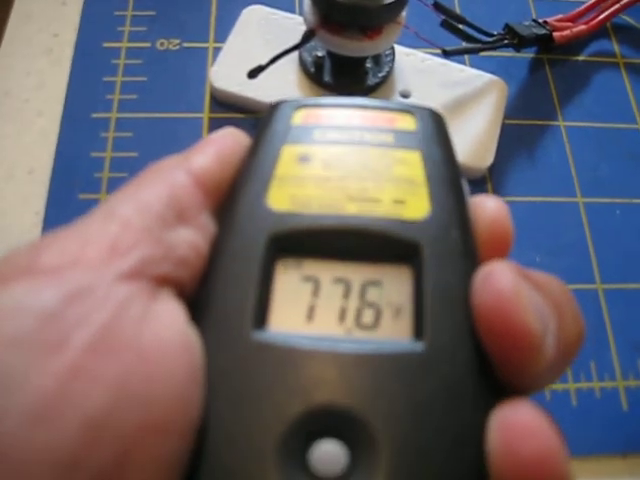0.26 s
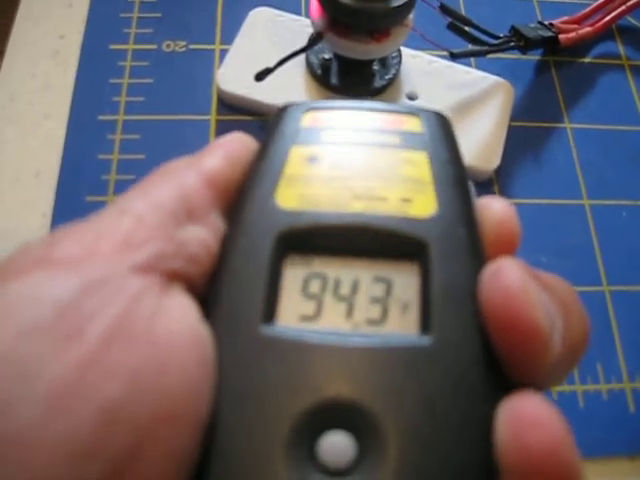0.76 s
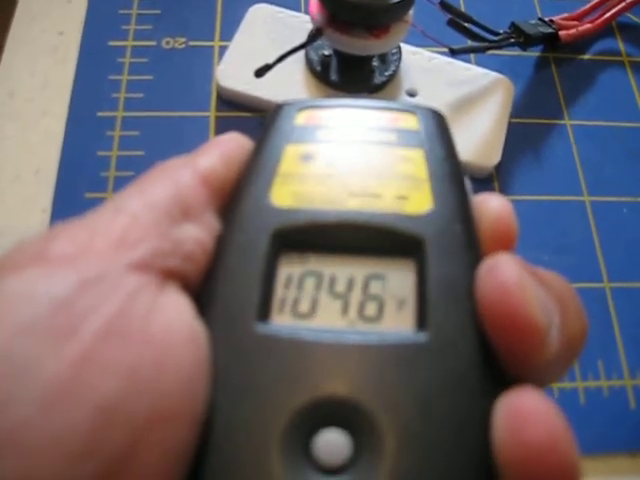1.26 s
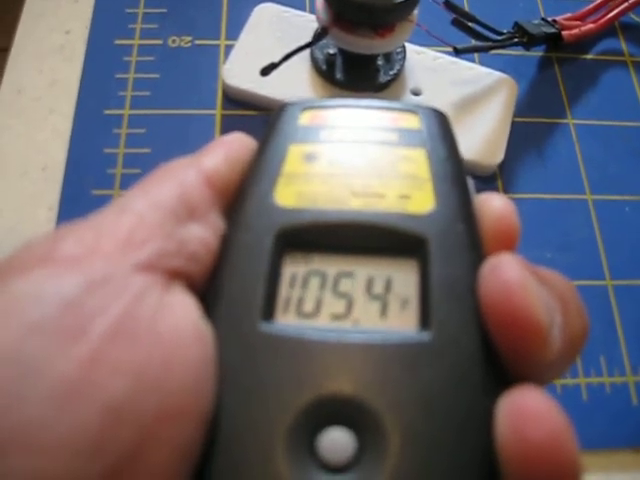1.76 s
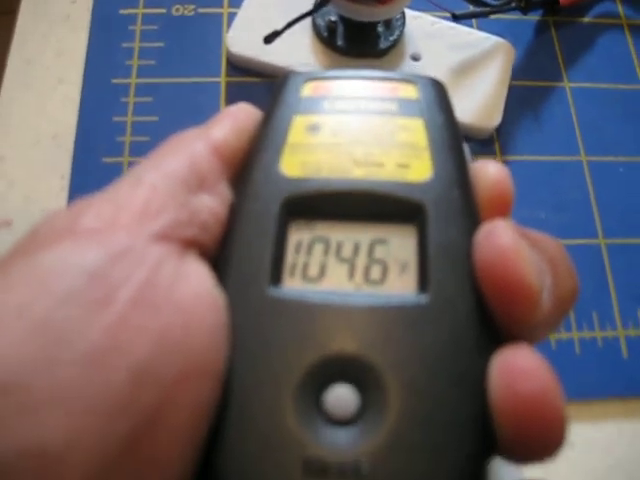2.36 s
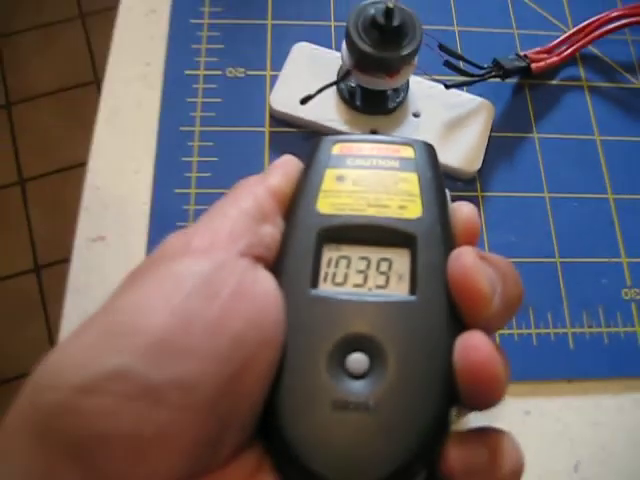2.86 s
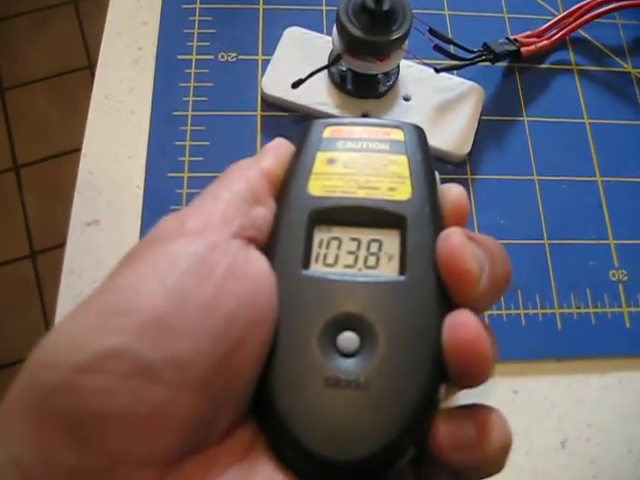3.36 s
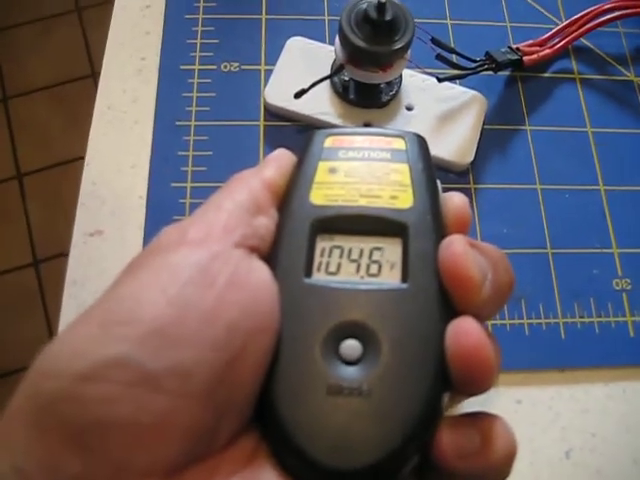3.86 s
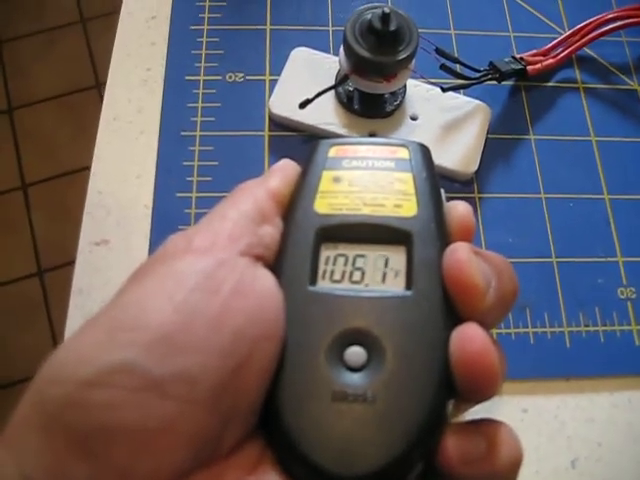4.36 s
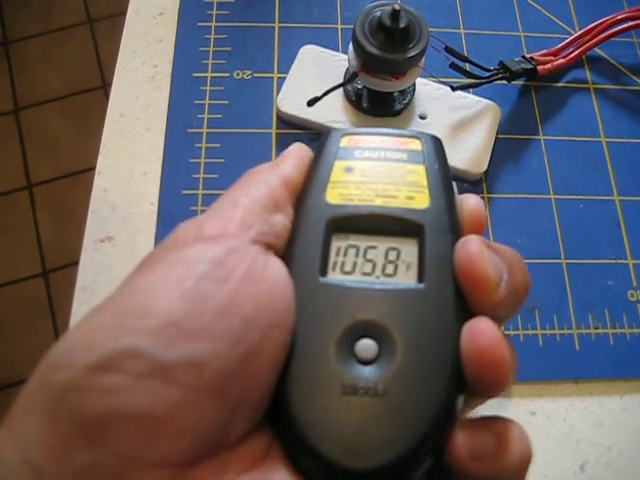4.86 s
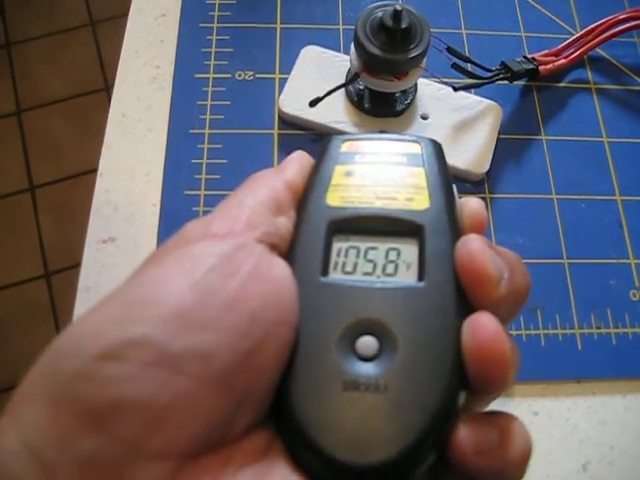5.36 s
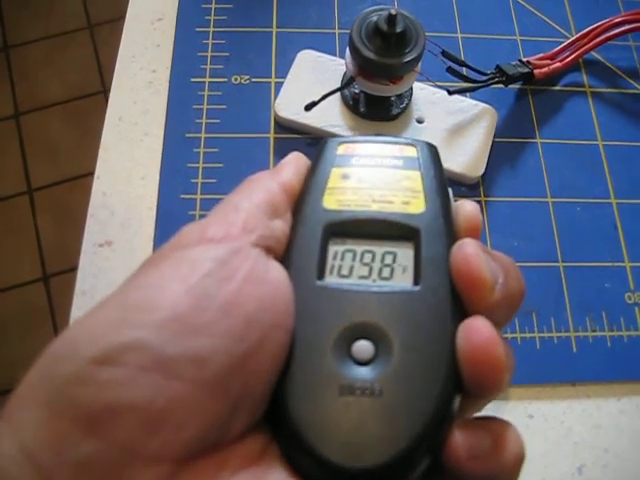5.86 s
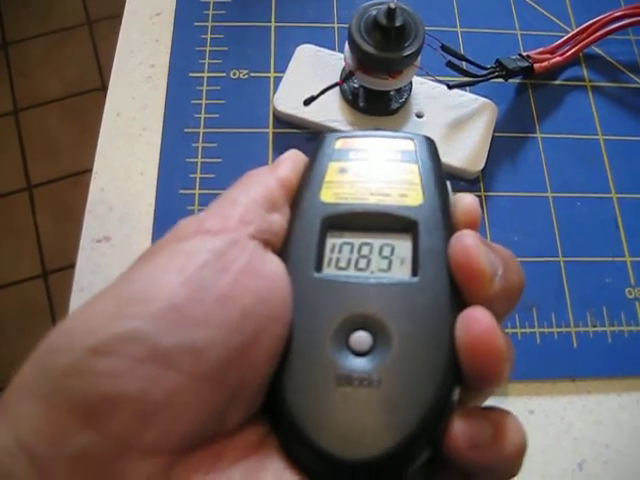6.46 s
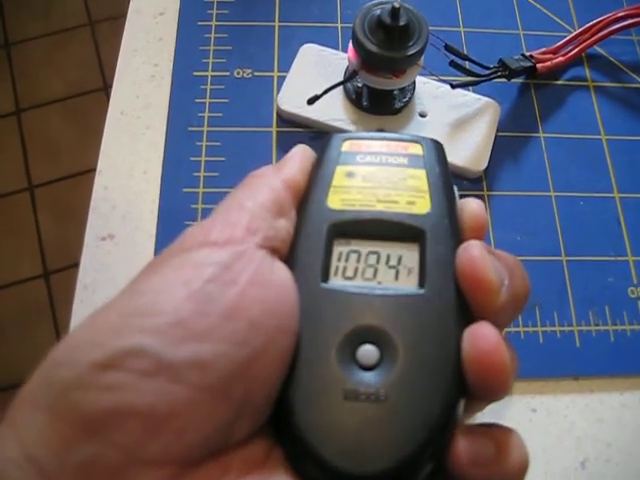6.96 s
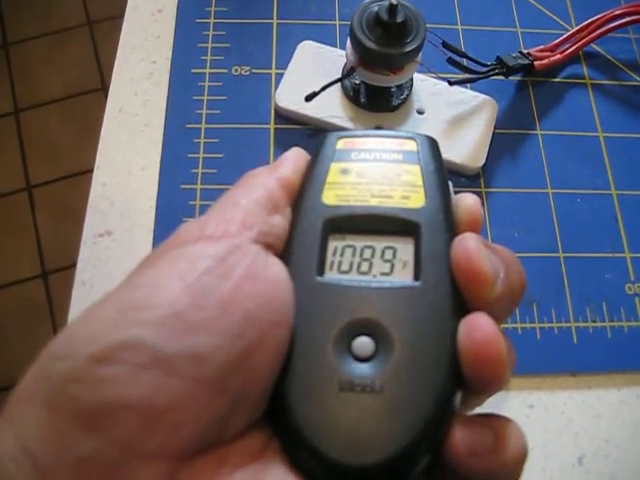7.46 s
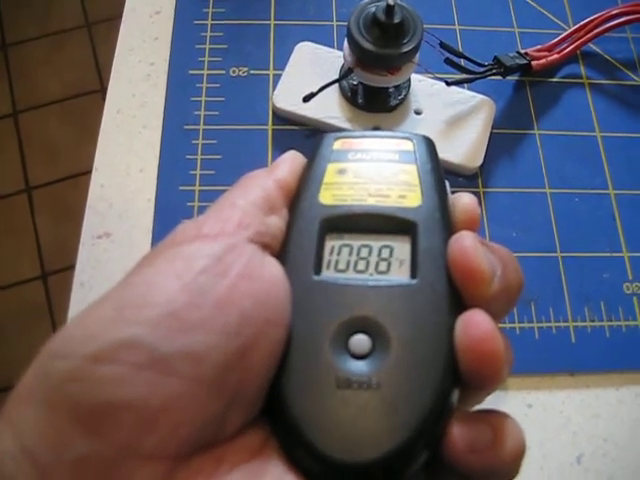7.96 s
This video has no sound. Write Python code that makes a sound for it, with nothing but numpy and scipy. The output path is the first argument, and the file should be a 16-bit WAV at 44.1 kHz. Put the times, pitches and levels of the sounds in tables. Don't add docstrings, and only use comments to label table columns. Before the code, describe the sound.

Continuous raspy whir of a tiny brushless motor on a workbench, with a shrill steady whistle and small brief surges in pitch.

```python
import sys
import numpy as np
from scipy import signal
from scipy.fft import rfft, irfft, next_fast_len
from scipy.io import wavfile
from scipy.ndimage import uniform_filter1d

SR = 44100
rng = np.random.default_rng(int(sys.argv[2]) if len(sys.argv) > 2 else 0)


def pcm_store(signal):
    levels = np.round(np.clip(np.atleast_2d(signal), -1, 1) * 32767)
    wavfile.write(sys.argv[1], SR, levels.astype(np.int16).T)


def ratio(d):
    e = np.asarray(d, float) / 20
    return 10 ** e


N = 361619
T = np.arange(N) / SR

STANCE = [
    (2.5, 0),
    (2.85, 1),
    (4.5, 1),
    (4.58, 2),
    (6.4, 2),
    (6.55, 3),
]
# (time [s], speed [m/s], half length [s])
CAMERA_PULLS = [
    (2.69, .19, .12),
    (3.3, .28, .075),
    (3.64, .13, .06),
]
# (time [s], level [dB], half length [s])
HAND_SHADOWS = [
    (2.33, 2, 0.046),
    (2.55, -3, .06),
    (2.7, -4, .03),
    (2.82, -1, .04),
    (3.7, -1.5, 0.24),
]
# (time [s], speed [turns/s])
SETTLED_SPEED = [
    (0, 94.9),
    (1.5, 95.03),
    (2.8, 95.3),
    (4.2, 95.45),
    (5.2, 95.56),
    (6.2, 95.7),
    (8.2, 95.82),
]
# (time [s], speed gained [turns/s])
SLIPS = [
    (0, 1.3),
    (.76, .8),
    (4.51, .75),
    (5.19, .75),
    (6.42, .75),
    (7.43, .75),
]

# (frequency [Hz], level [dB per Hz])
ROOM_SPECTRUM = [(30, -89), (60, -89), (150, -88.5), (300, -89), (600, -90), (1200, -89)]
# (frequency [Hz], level [dB per Hz])
AIR_SPECTRUM = [(9200, 4), (10000, 2), (12500, -4), (14000, 2), (17000, 2)]
# (frequency [Hz], level [dB per Hz])
RASP_SPECTRUM = [(4650, 7), (5000, -2.5), (5700, 2.5)]

# (ball passes, shaft turns added, level close [dB], level moved back [dB])
BALL_TONES = [(1, 3, -76, -78), (-1, 10, -73, -75), (1, 4, -73, -75), (1, 6, -74, -70), (1, 7, -70, -72),
              (2, 4, -72, -67), (-1, 15, -71, -69), (1, 9, -73, -74), (-1, 17, -71, -70),
              (-1, 20, -72, -67), (1, 15, -69, -70), (1, 17, -64, -66), (-1, 24, -54, -58),
              (-1, 25, -55, -59), (-1, 26, -66, -69)]
BALL_PASS = 3.228

# (angle [turns], level [dB])
TICK_SPOTS = [(.04, 4), (0.165, 8), (.29, 3.5), (.42, 6), (.55, 8.5), (.605, -20), (0.693, 0), (.81, -17),
              (.87, -9), (.95, -10)]
# (angle [turns], level [dB])
KNOCK_SPOTS = [(.08, 4), (.16, -4), (.22, -11), (.34, 3.5), (.44, 3), (.52, 2), (0.6, 5), (.73, -17),
               (.85, 5.5)]
# (frequency [Hz], level [dB per Hz])
BELL_RING = [(7100, -82), (7400, -73), (7600, -87), (8150, -76), (8400, -76), (8550, -74), (8900, -74),
             (9200, -67), (10000, -63), (11000, -63.5), (12000, -69), (13100, -74), (14000, -72.5),
             (17000, -75.5)]
# (frequency [Hz], level [dB per Hz])
BLOCK_RING = [(900, -86), (1500, -83), (1800, -79), (2050, -73.5), (2250, -77), (2700, -70), (3200, -69),
              (4200, -72.5), (4900, -63), (5700, -66), (5800, -76), (6250, -80.5), (6800, -68),
              (7080, -81.5)]

# (multiple of chopping rate, shaft turns added, close [dB], moved back [dB], crept [dB])
WHISTLE_TONES = [(1, -32, -47, -48, -48), (1, -24, -71, -53, -53), (1, -16, -52, -54, -51),
                 (1, -13, -58, -53, -56), (1, -8, -51, -49, -47), (1, -7, -54, -51, -50),
                 (1, -6, -47, -51, -51), (1, -5, -53, -54, -57), (1, -4, -63, -65, -67),
                 (1, 0, -45, -44, -44), (1, 4, -63, -55, -59), (1, 5, -56, -55, -53), (1, 6, -40, -43, -43),
                 (1, 7, -55, -57, -61), (1, 8, -37, -36, -38), (1, 9, -63, -59, -58),
                 (1, 16, -46, -45, -45), (1, 24, -47, -49, -47), (2, -32, -58, -52, -55),
                 (2, -16, -54, -54, -54), (2, -8, -43, -44, -44), (2, -6, -49, -50, -49)]

# (close [dB], moved back [dB], crept [dB], crept again [dB])
HUM_LEVELS = [(-59, -60, -61, -62), (-68, -66, -64, -65), (-59, -58, -56, -54.5), (-68, -67, -69, -69.5),
              (-71, -74, -79, -80), (-53, -55, -54, -56), (-59, -61, -63, -68), (-58, -57, -60, -60),
              (-69, -65, -73, -70), (-63, -58, -59, -60.5), (-61, -64, -60, -58.5), (-57, -58, -61, -61.5),
              (-57, -60, -60, -62), (-56, -55, -54, -54), (-62, -70, -62, -61.5), (-65, -63, -62, -59),
              (-71, -72, -70, -71), (-61, -65, -61, -59), (-57, -70, -65, -63), (-62, -58, -57.5, -56),
              (-56.5, -59, -50, -50.5), (-66, -64, -63, -66), (-46.5, -43, -49, -50), (-65, -61, -55, -53)]
# (multiple, level [dB])
HIGH_HUM = [(26, -57), (28, -46), (30, -46.5), (32, -50), (36, -50.5), (38, -51), (44, -56), (45, -58),
            (48, -59)]
SURGE_GAIN = {2: -8, 3: 3, 5: -18, 8: -13, 10: -4, 11: -3, 12: 3, 15: 3, 16: 7, 20: 6, 22: -3, 23: 10, 24:
              2}
THUMP_LAG = [(3, -.05), (4, -.33), (8, -.3), (11, .45), (22, .43), (24, .38), (48, .38)]


def curve(table):
    times, values = np.transpose(table)
    return np.interp(T, times, values)


def bumps(rows):
    return sum(height * np.exp(-((T - s) / half) ** 2) for s, height, half in rows)


def walk(rate):
    hold = int(SR / rate)
    steps = np.repeat(rng.standard_normal(N // hold + 1), hold)
    return 1.129 * uniform_filter1d(uniform_filter1d(steps, hold), hold)[:N]


def colour(x, spectrum):
    hz, db = np.transpose(spectrum)
    log_hz = np.log(hz)
    size = next_fast_len(N)
    f = np.log(np.arange(size // 2 + 1) * SR / size + 1)
    beyond = np.maximum(log_hz[0] - f, 0) + np.maximum(f - log_hz[-1], 0)
    gain = ratio(np.interp(f, log_hz, db) - 49 * beyond)
    y = irfft(rfft(x, size) * gain, size)[:N]
    return y / np.std(y)


def tones(rows, surge, waver_db, waver_rad):
    step = 64
    stance = curve(STANCE)[::step]
    wander = np.array([walk(9) for _ in range(7)])
    out = np.zeros(N)
    for k, (phase, stance_db, surge_db) in enumerate(rows):
        db = np.interp(stance, np.arange(len(stance_db)), stance_db)
        db = db + surge_db * surge[::step] + waver_db * wander[k % 7, ::step]
        level = np.repeat(ratio(db), step)[:N]
        out += np.sqrt(2) * level * np.sin(phase + waver_rad * wander[(k + 3) % 7])
    return out


def rattle(turns, spots, scatter_db, jitter, burst_ms, steady_db, grit_db):
    angle, db = np.transpose(spots)
    chance = rng.standard_normal((int(turns[-1]), len(spots), 2))
    when = np.arange(len(chance))[:, None] + angle + jitter * chance[..., 0]
    place = np.interp(when, turns, np.arange(N)).astype(int)
    strength = ratio(db + scatter_db * np.clip(chance[..., 1], -3, 1.3))
    strikes = np.zeros(N)
    np.add.at(strikes, place, strength)
    age = np.arange(200) / SR / (burst_ms / 1000)
    bursts = signal.fftconvolve(strikes, age * np.exp(1 - age))[:N]
    rubbing = ratio(steady_db + grit_db * walk(900))
    return (bursts + rubbing) * rng.standard_normal(N)


def slip_surges():
    rise_s, decay_s = .07, .19
    gained = np.zeros(N)
    for s, hz in SLIPS:
        age = T - s
        gained += hz * np.clip(age / rise_s, 0, 1) * np.exp(-np.maximum(age - rise_s, 0) / decay_s)
    return gained


def shaft_turns(surge):
    hunt_hz = .05
    return np.cumsum(curve(SETTLED_SPEED) + surge + hunt_hz * walk(14)) / SR


def room():
    return ratio(-60) * colour(rng.standard_normal(N), ROOM_SPECTRUM)


def dragged_air():
    return ratio(-37) * colour(rng.standard_normal(N), AIR_SPECTRUM)


def rasp(turns):
    tracks = rng.standard_normal((3, 256))
    place = (turns + .0015 * walk(30)) % 1 * 256
    share = np.array([walk(3.5) for _ in tracks])
    share = share / np.sqrt(np.sum(share ** 2, axis=0))
    scratch = np.zeros(N)
    for s, track in zip(share, tracks):
        scratch += s * np.interp(place, np.arange(256), track, period=256)
    return ratio(-41.5) * colour(scratch, RASP_SPECTRUM)


def bearing(turns):
    ticks = rattle(turns, TICK_SPOTS, scatter_db=3.6, jitter=.007, burst_ms=.17, steady_db=-7.5, grit_db=2.6)
    knocks = rattle(turns, KNOCK_SPOTS, scatter_db=2.0, jitter=.0081, burst_ms=.38, steady_db=-.5, grit_db=4.0)
    flutter = .41 * walk(16) + 1.73 * walk(150)
    bell = colour(ticks, BELL_RING) * ratio(-28.48 + .3 * flutter)
    sag_db = -1.4 * np.sin(np.pi * T / T[-1])
    block = colour(knocks + .62 * ticks, BLOCK_RING) * ratio(-33 + sag_db + .45 * flutter)
    throb = ratio(1.5 * np.cos(2 * np.pi * BALL_PASS * turns))
    return (bell + block) * throb


def hollowed(rub):
    null_hz, null_width_hz = 7870, 400
    hollow_hz, hollow_width_hz, hollow_share = 5430, 380, .32
    rub = signal.lfilter(*signal.iirnotch(null_hz, null_hz / null_width_hz, SR), rub)
    hollow = signal.lfilter(*signal.iirpeak(hollow_hz, hollow_hz / hollow_width_hz, SR), rub)
    nearness = np.clip(1 - curve(STANCE), 0, 1)
    return rub - hollow_share * nearness * hollow


def balls(turns, surge):
    rows = []
    for passes, added, *db in BALL_TONES:
        phase = 2 * np.pi * ((passes * BALL_PASS + added) * turns + rng.random())
        rows.append((phase, db, 0))
    return tones(rows, surge, waver_db=1.5, waver_rad=.2)


def whistle(turns, surge):
    chop_hz, sag_hz_per_s, sound_speed = 8020.1, .45, 343
    doppler = 1 - bumps(CAMERA_PULLS) / sound_speed
    chops = np.cumsum((chop_hz - sag_hz_per_s * T) * doppler) / SR
    rows = []
    for multiple, added, *db in WHISTLE_TONES:
        phase = 2 * np.pi * (multiple * chops + added * turns + rng.random())
        rows.append((phase, db, 0))
    return ratio(-.2 + bumps(HAND_SHADOWS)) * tones(rows, surge, waver_db=1.0, waver_rad=.21)


def hum(turns, surge):
    high = np.arange(HIGH_HUM[0][0], HIGH_HUM[-1][0] + 1)
    high_db = np.interp(high, *np.transpose(HIGH_HUM))[:, None]
    high_db = high_db + 1.5 * rng.standard_normal((len(high), len(HUM_LEVELS[0])))
    high_db = high_db - 3 * (high[:, None] % 2)
    levels = np.vstack([HUM_LEVELS, high_db])
    multiple = np.arange(len(levels)) + 2
    lag = 2 * np.pi * np.cumsum(np.interp(multiple, *np.transpose(THUMP_LAG)))
    lag = lag + .0024 * multiple ** 2 * rng.standard_normal(len(levels)) * (multiple % 4 > 0)
    shake = .65 * np.sin(2 * np.pi * BALL_PASS * turns)
    rows = []
    for k, late, db in zip(multiple, lag, levels):
        phase = 2 * np.pi * k * turns - late + (k >= high[0]) * shake
        rows.append((phase, db, SURGE_GAIN.get(k, 0)))
    return tones(rows, surge, waver_db=.7, waver_rad=.12)


def scene():
    surge = slip_surges()
    turns = shaft_turns(surge)
    rub = hollowed(dragged_air() + rasp(turns) + bearing(turns))
    mix = room() + rub + balls(turns, surge) + whistle(turns, surge) + hum(turns, surge)
    return mix[None]


def low_pass(x):
    return signal.sosfilt(signal.butter(12, 15720, fs=SR, output="sos"), x)


def record(dry):
    mix = np.tanh(1.625 * dry) / 1.575
    return low_pass(mix)


dry = scene()
out = record(dry)
pcm_store(out)
```